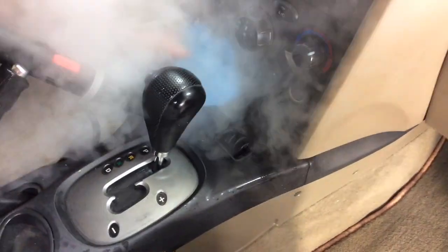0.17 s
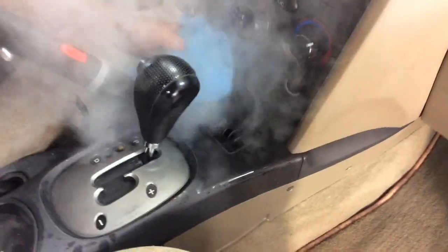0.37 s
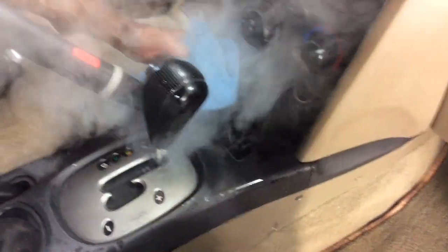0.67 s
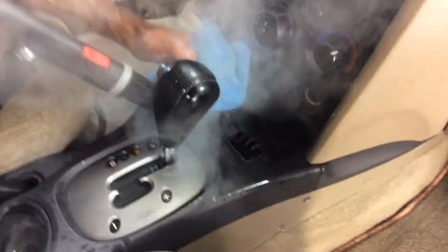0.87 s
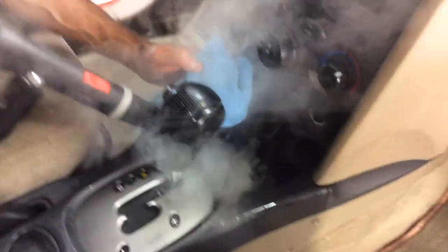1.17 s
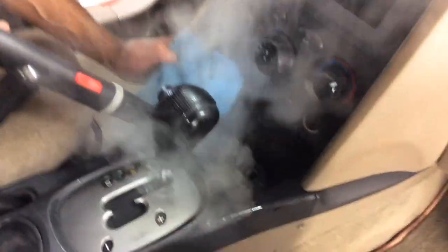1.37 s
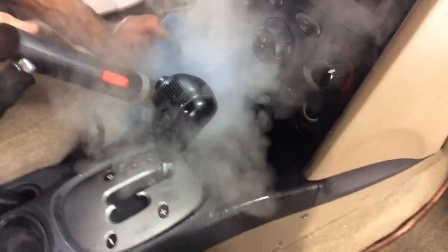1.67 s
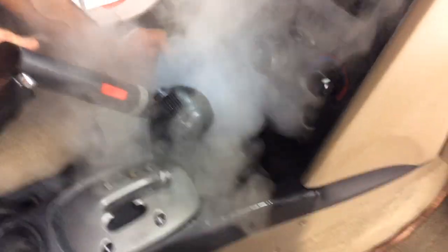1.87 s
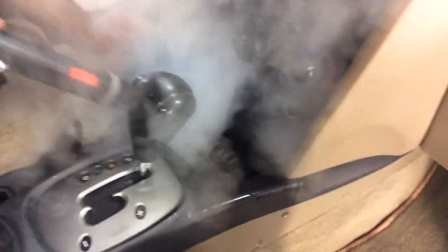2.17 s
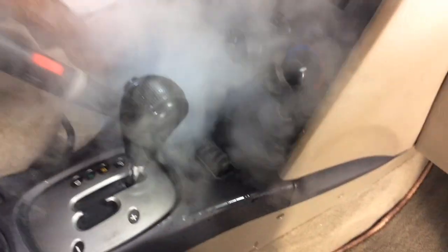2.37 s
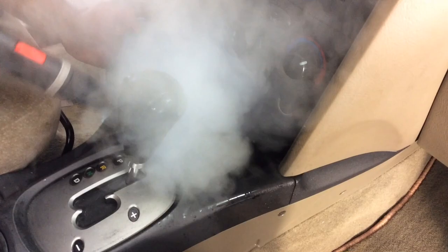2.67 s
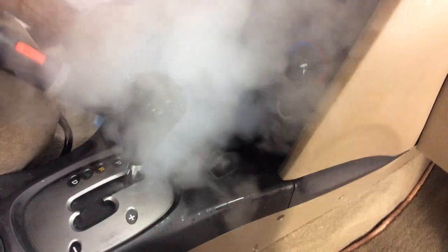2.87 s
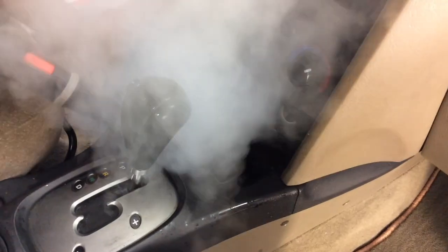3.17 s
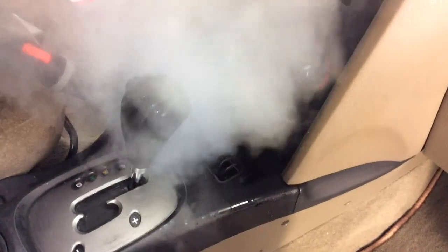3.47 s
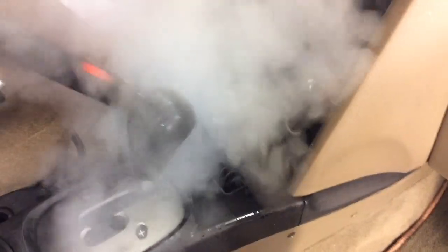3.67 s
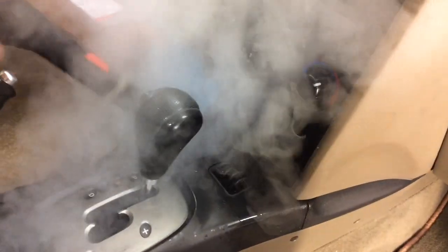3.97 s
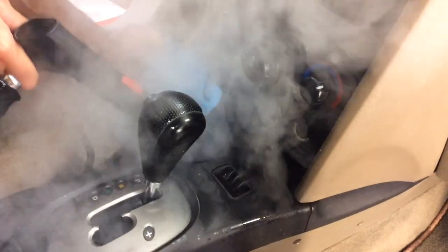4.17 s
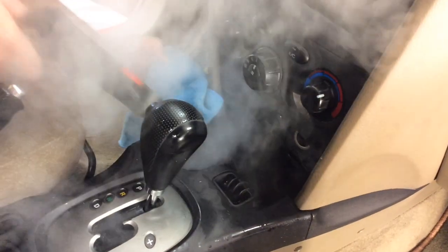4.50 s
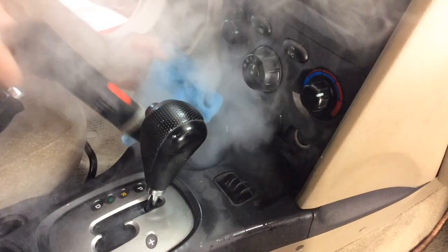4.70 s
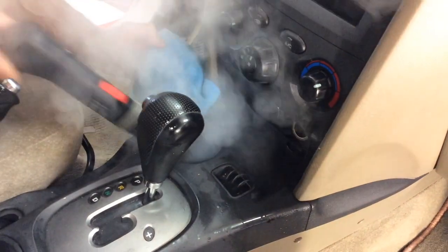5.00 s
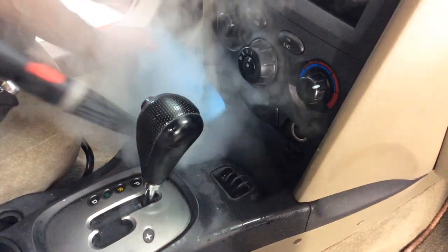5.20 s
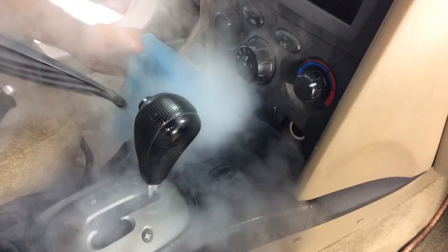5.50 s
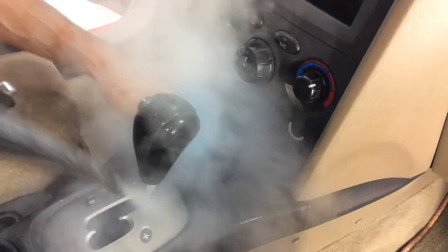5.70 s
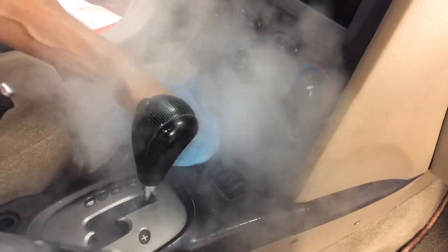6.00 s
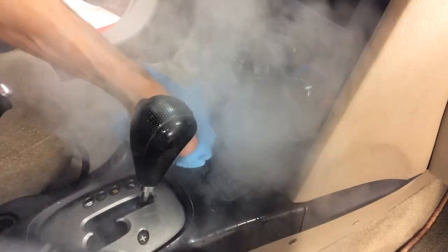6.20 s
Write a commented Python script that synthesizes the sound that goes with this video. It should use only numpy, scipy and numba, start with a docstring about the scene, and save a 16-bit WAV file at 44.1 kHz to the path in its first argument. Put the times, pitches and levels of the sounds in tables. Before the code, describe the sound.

Loud, continuous steam hiss from a cleaning nozzle, spitting water in little pops with brief thin whistles.

```python
"""A loud, sputtering hiss: a steam nozzle sweeps over a car's plastic console, close to a phone.
The turbulent jet radiates broadband noise and drives the air in recesses of the trim into resonance.
Slugs of condensed water pop in the hollows, narrow whistles come and go, droplets tick and a cloth
wipes once. A very high hiss flickers faintly. The phone's gain control ducks under the pops."""
import sys
import numpy as np
from scipy import signal
from scipy.io import wavfile
from scipy.ndimage import uniform_filter1d
from numba import njit

SR = 44100
rng = np.random.default_rng(int(sys.argv[2]) if len(sys.argv) > 2 else 0)


def pcm_store(signal):
    """Save signal as 16-bit PCM."""
    levels = np.round(np.clip(np.atleast_2d(signal), -1, 1) * 32767)
    wavfile.write(sys.argv[1], SR, levels.astype(np.int16).T)


N = 279990

# Spectrum of the free jet. Each row: frequency in Hz, relative spectral density in dB.
JET_SPECTRUM = [(18, -82), (30, -56), (202, -14), (292, -10), (674, 4), (831, -2), (1020, 1), (1730, -4.5),
                (1870, -2.5), (2430, -4.5), (4200, -6.5), (5600, -10), (7090, -13), (9460, -11),
                (13300, -24.5), (15500, -27)]

def jet_density_db(hz):
    """Spectral density of the jet, interpolated over log frequency."""
    hz_points, db_points = np.transpose(JET_SPECTRUM)
    return np.interp(np.log(hz), np.log(hz_points), db_points)


# Course of the free jet. Each row: time in seconds, level in dB, tilt in dB per octave.
JET_COURSE = [(0.0, -21, 0), (0.25, -33, 1.5), (0.6, -28.5, -1), (1.2, -29, 0), (1.63, -30, -0.5),
              (1.84, -28, -0.5), (2.9, -28.5, 0), (3.46, -30, 0), (4.03, -30, -0.5), (4.79, -28.5, -0.5),
              (5.31, -29, 0), (6.35, -33, 0)]

def jet(surge_db=.5, patch_db=.5, flicker_db=.5, treble_flicker_db=3.0):
    """Turbulent mixing noise: all bands surge together, neighbours share patches, each flickers alone."""
    level_db, tilt = curves(JET_COURSE)
    hiss, surge, patch = 0, walk(13), walk(12)
    for hz in np.r_[30 * 2 ** np.arange(0, 7, 1 / 3), np.arange(3800, 16300, 600)]:
        width = min(hz * .23, 600)
        patch = unit(patch + 2 * walk(13))
        steady_db = jet_density_db(hz) + 10 * np.log10(width) + tilt * np.log2(hz / 2000)
        own_db = (flicker_db + treble_flicker_db * hz / 16000) * walk(30)
        db = steady_db + surge_db * surge + patch_db * patch + own_db
        hiss += undb(db) * band(hz, 1.79 * width)
    return unit(hiss) * undb(level_db)


# The nozzle starts close, blowing into many recesses at once, then draws back.
# Each row: time in seconds, level in dB relative to close_db.
CLOSE_BLAST = [(0.0, -2.5), (0.14, 2.5), (0.21, 1.5), (0.23, -12), (0.25, 2), (0.34, -0.5), (0.46, -8.5),
               (0.5, -14), (0.7, -20), (6.35, -90)]
# Brief swells, listed by sound. Each row: peak time in seconds, level in dB, length in seconds.
SPURTS = dict( deep=[(0.112, -28, 0.089), (0.256, -38, 0.071), (0.37, -30.5, 0.084), (0.46, -24.5, 0.08),
          (0.64, -30, 0.35), (0.81, -32, 0.14), (0.962, -28.5, 0.13), (1.035, -30, 0.066),
          (1.122, -29, 0.073), (1.336, -35, 0.11), (3.915, -36, 0.061), (4.334, -40, 0.14),
          (1.72, -35, 0.1), (4.745, -29, 0.1)], cup=[(0.04, -28, 0.16), (0.442, -35, 0.021),
          (0.514, -39, 0.07), (0.64, -28.5, 0.087), (1.52, -33, 0.16), (1.72, -27, 0.21),
          (1.735, -28, 0.057), (4.2, -36, 0.25), (4.335, -25, 0.075), (4.56, -31, 0.061),
          (4.78, -34.5, 0.11), (4.886, -32, 0.041), (4.936, -39, 0.077), (5.03, -34, 0.26)],
          shallow=[(0.14, -37, 0.1), (0.248, -26, 0.042), (0.31, -42, 0.08)], rim=[(0.585, -32, 0.1),
          (0.63, -28, 0.034), (0.72, -34, 0.11), (0.83, -29.5, 0.17), (0.93, -37, 0.1), (1.01, -33.5, 0.12),
          (1.41, -33.5, 0.2), (1.455, -29.5, 0.091), (1.535, -19, 0.14), (1.65, -25, 0.11),
          (1.735, -22, 0.074), (4.58, -37.5, 0.12)], slot=[(0.06, -32, 0.31), (0.26, -21, 0.044),
          (0.39, -26, 0.22), (0.53, -39, 0.073), (0.59, -31, 0.057), (0.665, -28, 0.12), (0.82, -31, 0.2),
          (0.96, -34, 0.079), (2.25, -40, 0.13)], groove=[(0.07, -28, 0.23), (0.18, -31, 0.07),
          (0.35, -31, 0.099), (0.42, -29, 0.16), (0.595, -30.5, 0.08), (0.68, -37, 0.13),
          (0.815, -28.5, 0.068), (0.86, -32, 0.058), (1.015, -31.5, 0.08), (1.125, -33, 0.04),
          (1.55, -42, 0.1), (1.72, -38, 0.08), (4.56, -40, 0.1)], notch=[(0.865, -36, 0.04),
          (1.53, -38, 0.14), (1.73, -36, 0.06), (3.7, -50, 0.9), (4.0, -42, 0.066), (4.385, -44, 0.036),
          (4.45, -40, 0.18)], vent=[(0.15, -27, 0.07), (0.27, -24, 0.14), (0.375, -18.5, 0.04),
          (0.52, -34, 0.29), (1.135, -29.5, 0.053), (1.56, -28, 0.12), (1.73, -30.5, 0.12)],
          seam=[(0.3, -44, 0.054), (0.69, -41, 0.23), (0.888, -51, 0.11), (1.82, -36.5, 0.18),
          (1.97, -42.5, 0.26), (2.126, -38, 0.11), (2.32, -38, 0.21), (5.24, -40, 0.17), (5.47, -38, 0.21)],
          ring=[(2.65, -42, 0.5), (3.05, -42, 0.6), (4.4, -45, 0.83)], spit=[(0.04, -30, 0.29),
          (1.82, -39, 0.15), (3.35, -44, 0.93), (5.26, -37, 0.12)], sizzle=[(1.19, -39, 0.15),
          (1.29, -36, 0.11), (1.39, -38, 0.17)], edge=[(1.23, -39, 0.13), (1.345, -37, 0.23),
          (1.43, -41, 0.15)], fizz=[(0.5, -43, 0.12), (0.62, -40, 0.1), (0.77, -46, 0.17),
          (0.95, -46, 0.26), (1.1, -42, 0.13), (1.6, -44, 0.12), (2.32, -52, 0.084), (3.74, -51, 0.1)])

def resonance(modes, spurts, sputter_db, wander_db, close_db=-np.inf, slide=1, drift=.012):
    """Forced resonance: noise excites drifting modes, in the close blast and in each spurt."""
    drive = undb(curves(CLOSE_BLAST)[0] + close_db)
    for peak_s, db, length in spurts:
        start = peak_s - length / 2
        shape = swell(length, rise=.5)[1] ** .59  # flattened top
        skipped = max(int(-start * SR), 0)
        add(drive, start, undb(db) * shape[skipped:])
    ringing = 0
    for hz, width, db in modes:
        gain = undb(db + wander_db * walk(40))
        ringing += gain * band(hz * slide * (1 + drift * walk(20)), width)
    return unit(undb(sputter_db * walk(110)) * ringing) * drive


# Air modes of each kind of recess. Each row: frequency in Hz, width in Hz, relative level in dB.
DEEP = [(386, 71, -12), (533, 190, 1), (755, 270, 1)]
CUP = [(866, 190, -1), (1030, 203, 10), (1270, 220, -11)]
SHALLOW = [(2520, 240, 5), (2820, 200, 0.5), (3200, 130, -20)]
RIM = [(2777, 200, 0.47), (2970, 330, -0.33)]
SLOT = [(3950, 250, 11), (3470, 210, -21)]
VENT = [(1540, 124, 3), (1920, 90, 0.5), (2160, 280, -12)]
SEAM = [(8000, 480, 1), (9200, 300, 1.5), (11600, 1400, -12)]
SIZZLE = [(8200, 500, -5), (8950, 760, 4), (9500, 700, -2), (10400, 700, -5)]

def recesses():
    """Cavity resonance: the air in each recess rings in rough bands as the jet strikes it."""
    return (resonance(DEEP, SPURTS["deep"], sputter_db=2.7, wander_db=2.4, close_db=-35.5)
            + resonance(CUP, SPURTS["cup"], sputter_db=1.7, wander_db=.71, close_db=-27)
            + resonance(SHALLOW, SPURTS["shallow"], sputter_db=3.9, wander_db=.9, close_db=-22)
            + resonance(RIM, SPURTS["rim"], sputter_db=2.2, wander_db=.26, close_db=-45)
            + resonance(SLOT, SPURTS["slot"], sputter_db=3.3, wander_db=.87, close_db=-39)
            + resonance(VENT, SPURTS["vent"], sputter_db=2.9, wander_db=4.6, close_db=-34)
            + resonance(SEAM, SPURTS["seam"], sputter_db=2.4, wander_db=2.2, close_db=-40.5)
            + resonance(SIZZLE, SPURTS["sizzle"], sputter_db=2.5, wander_db=2.6, close_db=-54))


# Slugs of water, and from 6.01 s brief squeaks of the cloth as it rubs. Each row: time in seconds, peak level
# in dB, pitch in Hz, length in seconds.
POPS = [(0.023, -6, 1070, 0.0079), (0.1, -18, 2520, 0.0069), (0.126, -13, 2580, 0.013),
        (0.14, -7.5, 1110, 0.0052), (0.1405, -6, 2770, 0.0055), (0.1504, -2.5, 2570, 0.0034),
        (0.204, -13, 950, 0.011), (0.2468, -16, 2620, 0.0093), (0.295, -6, 2400, 0.0091),
        (0.324, -11, 2460, 0.0087), (0.433, -16, 1006, 0.026), (0.552, -21, 540, 0.012),
        (0.565, -9.5, 412, 0.012), (0.567, -14, 594, 0.008), (0.573, -13, 2710, 0.01),
        (0.589, -16, 2700, 0.011), (0.599, -13, 2630, 0.008), (0.614, -18, 700, 0.013),
        (0.652, -21, 3950, 0.013), (0.814, -13.5, 2650, 0.014), (0.992, -20.5, 2690, 0.016),
        (0.629, -16.5, 577, 0.014), (0.786, -24, 538, 0.026), (0.847, -21, 517, 0.015),
        (0.868, -22, 564, 0.015), (0.947, -20, 520, 0.01), (0.957, -7.5, 534, 0.021),
        (1.033, -21, 770, 0.015), (1.11, -16, 510, 0.012), (1.125, -7, 420, 0.013),
        (1.152, -22, 538, 0.017), (1.256, -23, 553, 0.01), (1.439, -17, 3050, 0.0049),
        (1.4625, -10.5, 2820, 0.011), (1.508, -18, 2780, 0.0076), (1.523, -16, 2840, 0.007),
        (1.532, -15, 2950, 0.0079), (1.542, -12, 2860, 0.0063), (1.6207, -17, 3000, 0.01),
        (1.649, -20.5, 2820, 0.012), (1.88, -19, 277, 0.011), (2.163, -21.5, 660, 0.012),
        (2.226, -27, 4000, 0.006), (2.243, -27, 4200, 0.0074), (2.256, -23, 4370, 0.005),
        (2.27, -25, 3370, 0.007), (2.275, -24, 4280, 0.006), (2.36, -25.5, 590, 0.01),
        (2.709, -24.5, 4230, 0.0095), (2.74, -23.5, 593, 0.015), (3.288, -27, 547, 0.02),
        (3.9025, -4, 460, 0.008), (3.916, -23, 447, 0.01), (3.922, -28, 980, 0.008),
        (4.186, -29.5, 575, 0.01), (4.314, -28, 1240, 0.013), (4.323, -18, 536, 0.031),
        (4.331, -3.5, 567, 0.022), (4.34, -13.5, 1030, 0.024), (4.349, -11, 506, 0.012),
        (4.354, -6, 395, 0.016), (4.368, -18, 546, 0.016), (4.546, -19.5, 1020, 0.012),
        (4.647, -3, 977, 0.017), (4.719, -18, 580, 0.007), (4.738, -23, 560, 0.016),
        (4.76, -18, 970, 0.012), (4.765, -11, 378, 0.015), (4.777, -20, 1030, 0.0095),
        (4.879, -14, 1030, 0.019), (4.993, -21, 1030, 0.012), (5.008, -19, 1030, 0.01),
        (5.09, -29, 450, 0.012), (5.4, -27, 533, 0.016), (5.62, -27, 690, 0.013), (5.866, -30, 485, 0.014),
        (6.01, -29, 4080, 0.013), (6.021, -26, 4100, 0.009), (6.03, -26, 4100, 0.011),
        (6.038, -29, 2850, 0.011), (6.049, -27, 2770, 0.008), (6.074, -31, 2500, 0.009)]

def pops(sag_hz=61, octave_db=-19, roughness=.24):
    """Transient excitation: a slug briefly pumps a hollow, whose pitch sags as it opens."""
    out = np.zeros(N)
    for (s, db, hz, length), turn in zip(POPS, rng.random(len(POPS))):
        t, shape = swell(length, rise=.42)
        cycles = hz * t + sag_hz * t * (1 / 4 - t / t[-1] / 2)
        phase = 2 * np.pi * (cycles + turn)
        tone = np.sin(phase) + undb(octave_db) * np.sin(2 * phase)
        spray_noise = roughness * band(.91 * hz, hz, size=4096)[-len(t):]
        add(out, s - .003, undb(db) * shape ** .72 * (tone + spray_noise))
    return highpass(out, 230, order=3)  # small hollows radiate no bass


# The clearest whistles. Each row: time in seconds, peak level in dB, pitch in Hz.
WHISTLES = [(0.2279, -20, 5290), (0.5935, -24, 5170), (0.6734, -19.5, 9360), (0.6958, -26, 11600),
            (0.7178, -25, 11600), (0.28, -30, 11600), (0.33, -32, 11600), (0.47, -32, 11300),
            (0.777, -24.5, 9700), (0.8799, -22, 9240), (0.9, -29, 11800), (1.1757, -28, 9200),
            (1.2141, -20, 11900), (1.2531, -25, 11400), (1.262, -27, 8960), (1.3019, -26, 11800),
            (1.3289, -26, 12400), (1.347, -24, 12200), (1.135, -25, 9200), (1.187, -22, 8900),
            (1.2, -28, 9900), (1.225, -33, 13200), (1.27, -31, 13200), (1.3, -27, 9100), (1.222, -27, 8850),
            (1.264, -24, 8050), (1.366, -28, 8500), (1.39, -25, 8950), (1.402, -28, 8300),
            (1.4, -29, 12000), (1.42, -28, 12400), (1.9415, -23.5, 9400), (2.1271, -23, 9500),
            (2.3, -20, 7700), (2.366, -32, 9050), (2.43, -34, 11700), (2.46, -31, 11700),
            (2.51, -34, 13900), (2.65, -30, 10300), (2.7, -33, 10300), (2.78, -26, 9400),
            (3.15, -32, 11000), (3.19, -29, 9200), (3.33, -24, 9400), (3.8671, -26, 11600),
            (4.4298, -26, 5740), (4.4538, -27, 8160), (4.6359, -26, 9160), (5.21, -25, 9900),
            (5.2629, -18, 8200), (5.33, -24.5, 4100), (5.45, -23, 3210), (5.93, -28, 3750),
            (6.075, -27, 3700)]

def whistles(clear_s=.033, strays_per_s=130, width_share=.082, crest_factor=3):
    """Edge tones: steam passing an edge sings briefly; faint strays follow the jet's spectrum."""
    when, faintness, pitch, duration = rng.random((int(strays_per_s * N / SR), 4)).T
    stray_hz = 3000 + 12500 * pitch
    stray_db = -28.5 - 8.5 * faintness + jet_density_db(stray_hz) - jet_density_db(4000)
    strays = list(zip(when * N / SR, stray_db, stray_hz, .014 + .04 * duration))
    out = np.zeros(N)
    for s, db, hz, length in [(*row, clear_s) for row in WHISTLES] + strays:
        t, shape = swell(length, rise=.32)
        tone = band(hz, width_share * hz, size=4096)[-len(t):]
        add(out, s - .008, undb(db) / crest_factor * shape * tone)
    return out


# Bands that colour the hiss. Each row: frequency in Hz, width in Hz, relative level in dB.
SPLASH = [(726, 570, 3.5), (1350, 1000, 2.5), (2110, 560, 0), (3070, 700, -5), (4970, 1800, -4.5)]
SPIT = [(8500, 820, -9), (10240, 2000, 6)]
RING = [(1890, 110, 0.5)]

def spray():
    """Band-limited noise: spray thrown back by the close blast, a bright spit and a faint narrow ring."""
    return (resonance(SPLASH, [], sputter_db=2.5, wander_db=3.1, close_db=-22)
            + resonance(SPIT, SPURTS["spit"], sputter_db=2.2, wander_db=1.8)
            + resonance(RING, SPURTS["ring"], sputter_db=1.5, wander_db=1.2))


# Air modes of grooves and notches. Each row: frequency in Hz, width in Hz, relative level in dB.
GROOVE = [(4580, 500, 0), (5130, 540, -15)]
NOTCH = [(5740, 270, 0)]

def grooves():
    """Cavity resonance: grooves and notches ring in the treble."""
    return (resonance(GROOVE, SPURTS["groove"], sputter_db=2.5, wander_db=1, close_db=-40)
            + resonance(NOTCH, SPURTS["notch"], sputter_db=4.1, wander_db=1.3))


# Hiss off an edge. Each row: frequency in Hz, width in Hz, relative level in dB.
EDGE = [(10600, 900, -9), (11200, 500, -8), (11900, 900, 0), (13000, 1000, -8)]
# Its glide. Each row: time in seconds, pitch factor.
EDGE_SLIDE = [(1.22, 1.06), (1.27, 1), (1.35, 1.03), (1.48, 1)]

def edge_hiss():
    """Edge noise: the hiss shifts in pitch as the nozzle slides along an edge."""
    return resonance(EDGE, SPURTS["edge"], sputter_db=2.4, wander_db=2.5, slide=curves(EDGE_SLIDE)[0])


def spatter(drops_per_s=700, level_db=-45.5, spread_db=2.1, hz=8200, width_hz=2200):
    """Impact noise: droplets tick on the plastic in flurries, most small, a few larger."""
    chance, size = rng.random((2, N))
    drop_db = -spread_db * np.log(1 - size) + .94 * walk(14)
    clicks = (chance < drops_per_s / SR) * undb(drop_db) * np.sign(rng.standard_normal(N))
    return bandpass(clicks, hz, width_hz) * undb(level_db)


# The wipe. Its row: peak time in seconds, level in dB, length in seconds.
WIPE = [(6.04, -32.5, 0.09)]
# Bands of the cloth. Each row: frequency in Hz, width in Hz, relative level in dB.
CLOTH = [(1660, 400, -3), (2070, 330, 1), (2800, 450, 0), (4070, 400, -12)]

def cloth():
    """Friction noise: a cloth rubs once over the trim."""
    return resonance(CLOTH, WIPE, sputter_db=1.9, wander_db=.99)


# Very high hiss. Each row: frequency in Hz, width in Hz, relative level in dB.
TOP_FLICKER = [(13900, 700, -8), (15100, 1100, -1)]

def top_flicker():
    """Amplitude modulation: faint, brief flickers of hiss at 14-15 kHz."""
    flickers = list(SPURTS.values())[-1]
    return resonance(TOP_FLICKER, flickers, sputter_db=2.5, wander_db=1.8)


def undb(db):
    return 10 ** (np.asarray(db) / 20)


def unit(x):
    return x / np.sqrt(np.mean(x ** 2))


def curves(rows):
    """Linear interpolation of (seconds, value, ..) rows, one value per sample."""
    s, *columns = np.transpose(rows)
    return [np.interp(np.arange(N) / SR, s, c) for c in columns]


def walk(rate):
    """Random modulation: levels held 1 / rate seconds and smoothed twice, rms 1."""
    hold = int(SR / rate)
    steps = np.repeat(rng.standard_normal(N // hold + 1), hold)
    return unit(uniform_filter1d(uniform_filter1d(steps, hold), hold)[:N])


def swell(length, rise):
    """Times and a raised-cosine envelope that peaks after the share `rise` of its length."""
    t = np.arange(int(length * SR)) / SR
    ramp = np.interp(t / t[-1], [0, rise, 1], [0, 1, 0])
    return t, np.sin(np.pi / 2 * ramp) ** 2


def add(out, s, sound):
    """Superposition: mix a sound in from s seconds."""
    i = max(int(s * SR), 0)
    out[i:i + len(sound)] += sound[:N - i]


@njit
def resonator(x, hz, width):
    """State-variable band-pass, gain 1 at a centre that may move."""
    y, mid, low = np.empty(len(x)), 0., 0.
    for i in range(len(x)):
        if i % 16 == 0:
            g, damping = np.tan(np.pi * hz[i] / SR), width / hz[i]
        v = (mid + g * (x[i] - low)) / (1 + g * (g + damping))
        mid, low, y[i] = 2 * v - mid, low + 2 * g * v, damping * v
    return y


def bandpass(x, hz, width):
    """Two equal resonators in cascade, scaled to rms 1."""
    centre, width = hz * np.ones(len(x)), float(width)
    return unit(resonator(resonator(x, centre, width), centre, width))


def band(hz, width, size=N):
    return bandpass(rng.standard_normal(size), hz, width)


def highpass(x, hz, order):
    return signal.sosfilt(signal.butter(order, hz, "high", fs=SR, output="sos"), x)


@njit
def follow(x, attack_s, release_s):
    """Envelope detection: rectify, then smooth with separate rise and fall times."""
    y, level = np.empty(len(x)), 0.
    for i in range(len(x)):
        lag_s = attack_s if abs(x[i]) > level else release_s
        level += (abs(x[i]) - level) / (lag_s * SR)
        y[i] = level
    return y


def scene():
    """Superposition at one microphone: both channels carry the same sum."""
    bands = recesses() + top_flicker() + spray() + grooves() + edge_hiss()
    water = pops() + spatter()
    return np.tile(jet() + bands + water + whistles() + cloth(), (2, 1))


def record(dry, knee_db=-21.5, ratio=2.2, lookahead_s=.0021, bass_hz=40, top_hz=15700):
    """Dynamic compression turns loud moments down; then filters cut the rumble and the top."""
    ahead = np.minimum(np.arange(N) + int(lookahead_s * SR), N - 1)
    envelope = follow(dry[0], attack_s=.0031, release_s=.0091)[ahead]
    gain = np.maximum(envelope / undb(knee_db), 1) ** (1 / ratio - 1)
    lean = highpass(dry * gain, bass_hz, order=2)
    return signal.sosfilt(signal.ellip(14, .3, 60, top_hz, fs=SR, output="sos"), lean)


dry = scene()
out = record(dry)
pcm_store(out)
```